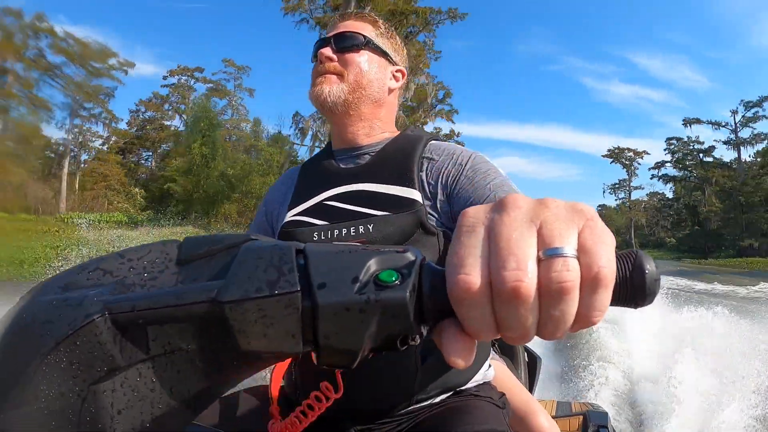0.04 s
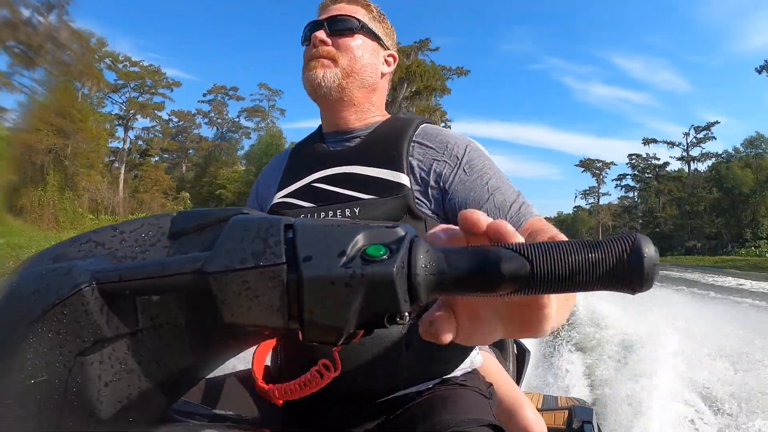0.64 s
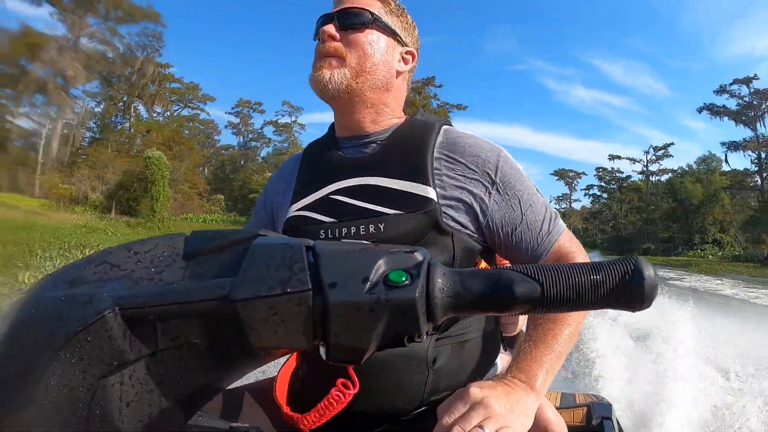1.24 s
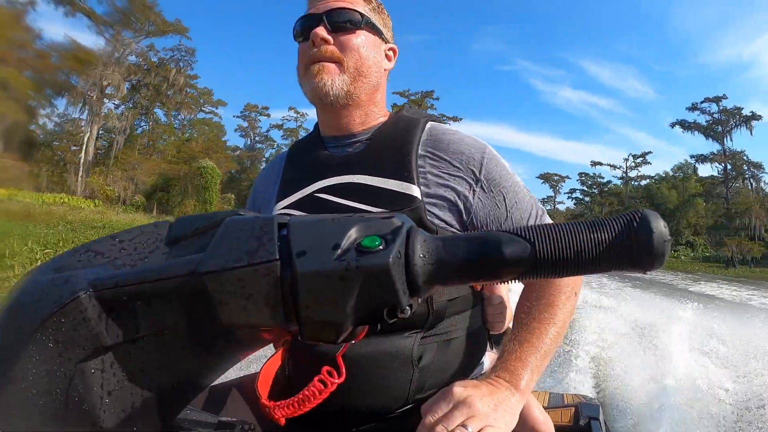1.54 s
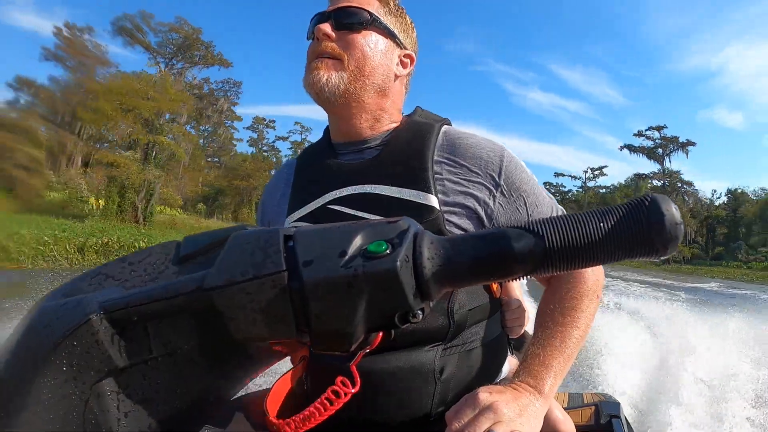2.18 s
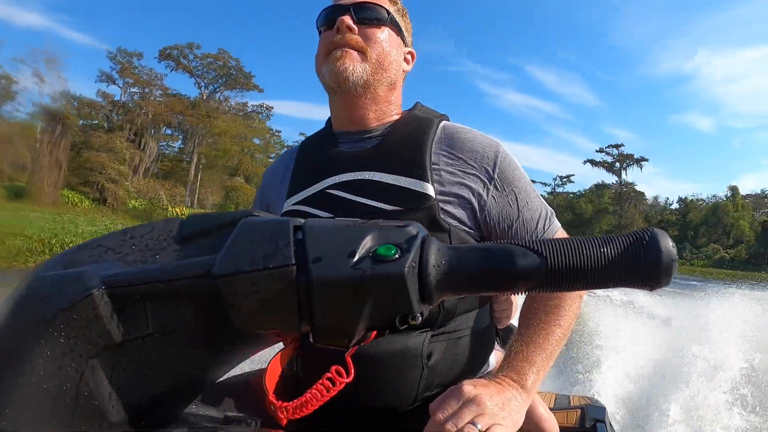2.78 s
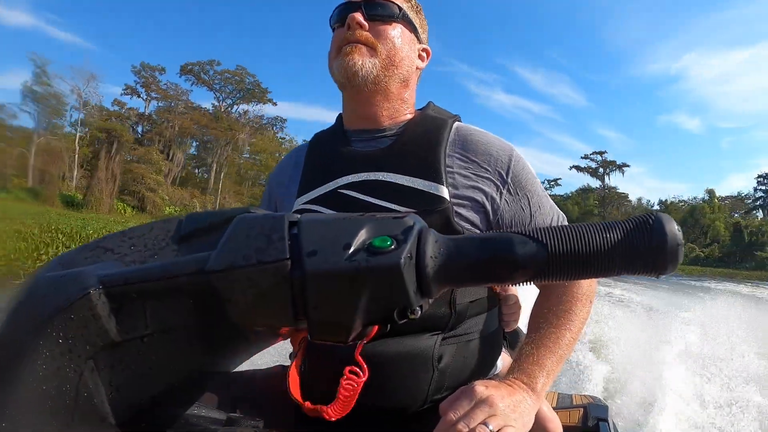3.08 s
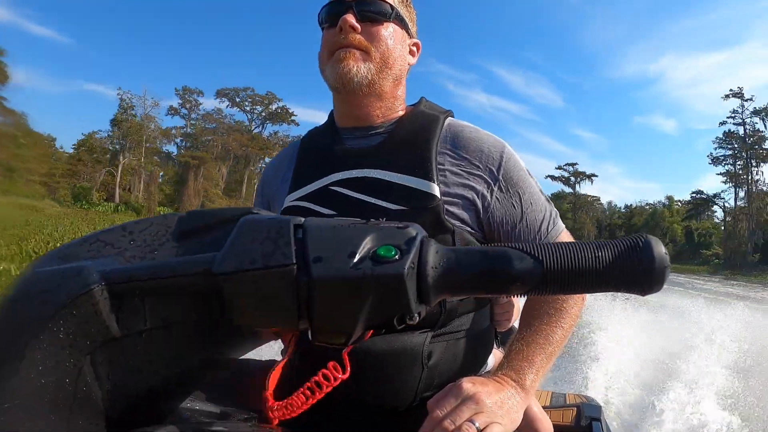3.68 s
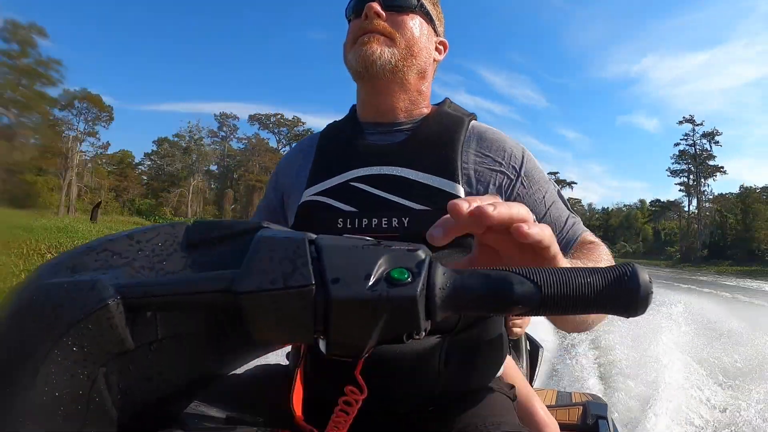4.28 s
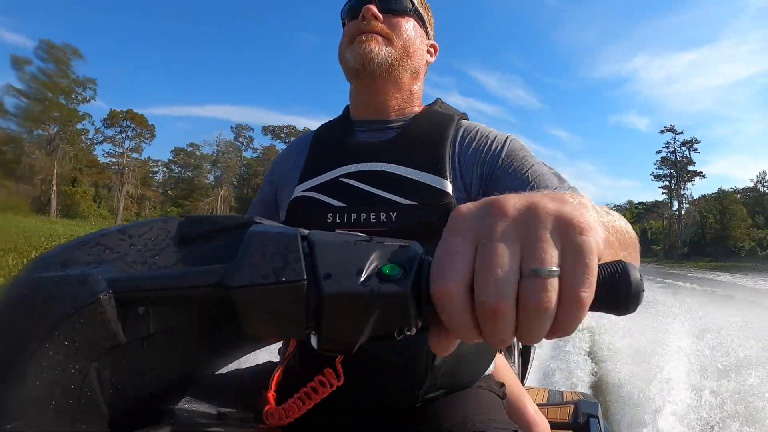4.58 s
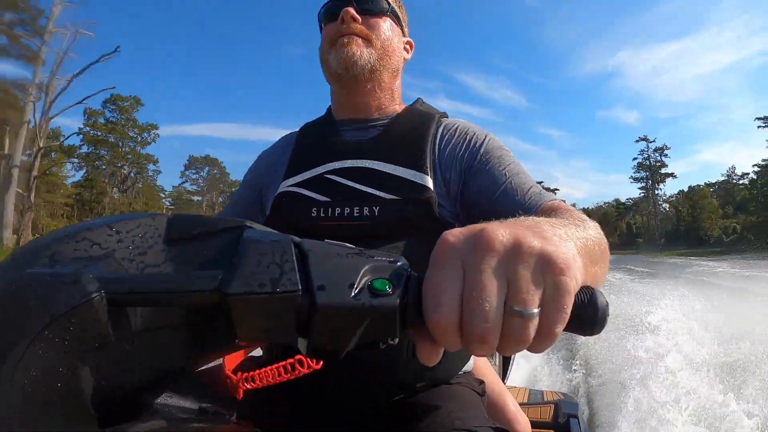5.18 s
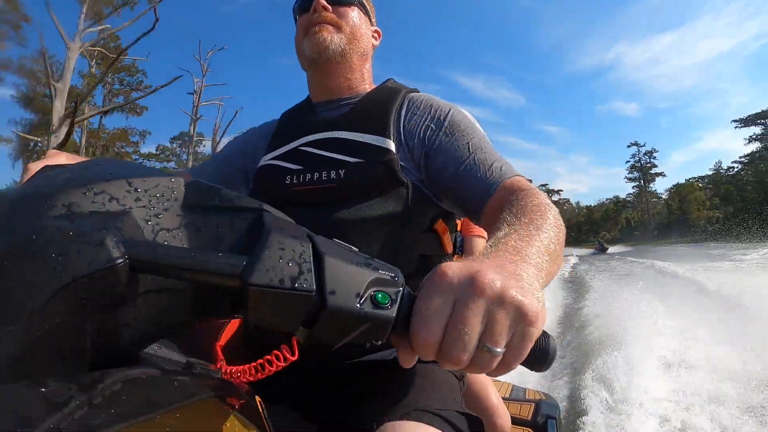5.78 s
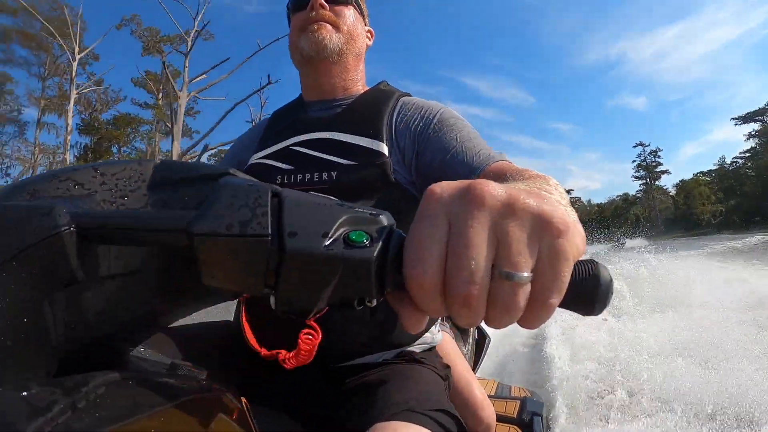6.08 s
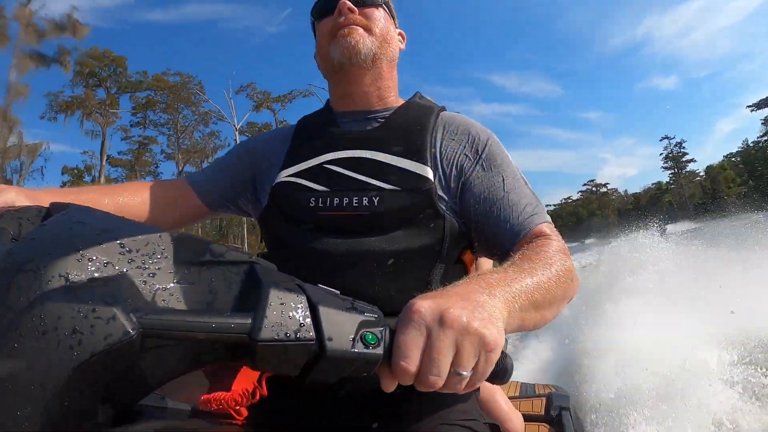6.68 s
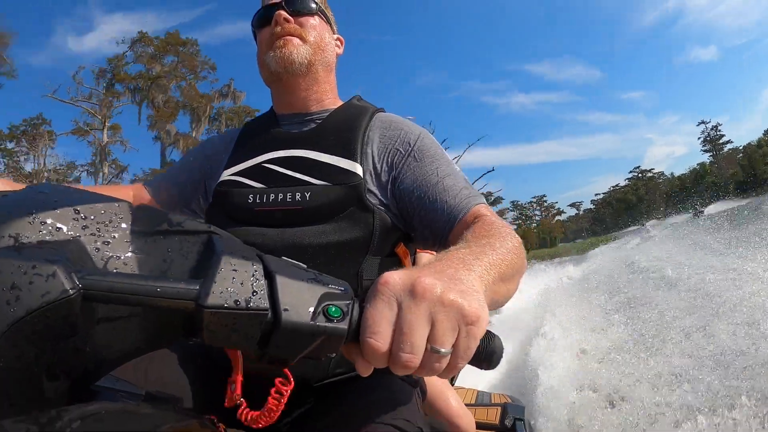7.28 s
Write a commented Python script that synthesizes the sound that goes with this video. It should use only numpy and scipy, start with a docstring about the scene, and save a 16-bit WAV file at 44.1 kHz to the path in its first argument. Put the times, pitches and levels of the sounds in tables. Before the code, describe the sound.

A supercharged personal watercraft runs fast along a river, heard from its handlebar. The exhaust drones and sputters under a thin whine, while wind rumbles and snaps on the microphone, the wake hisses and short, dull knocks come and go. The engine speeds up into a fuller drone, then drops back. Near the end spray hits the microphone, water gurgles briefly and the engine rises again.

```python
"""A supercharged personal watercraft runs fast along a narrow river, heard from its handlebar.
From the start the exhaust drones, choked at times by water, and the supercharger whines in step with
the engine; wind rumbles and snaps on the microphone, the wake hisses and short, dull knocks come and go.
From about 2 to 4 s the engine speeds up and the drone opens out, then it drops back to a sputter.
Near 7 s spray hits the housing, air gurgles through water on the microphone and the engine rises again."""
import sys
import numpy as np
from scipy import signal
from scipy.fft import rfft, irfft
from scipy.io import wavfile
from scipy.ndimage import uniform_filter1d, minimum_filter1d

SR = 44100
rng = np.random.default_rng(int(sys.argv[2]) if len(sys.argv) > 2 else 0)


def log_audio(samples):
    """Write samples as a 16-bit WAV file to the path given in sys.argv[1]."""
    # one column per channel
    frames = np.atleast_2d(samples).T
    # limit to full scale, then quantise
    limited = np.clip(frames, -1, 1)
    pcm = np.round(limited * 32767).astype(np.int16)
    wavfile.write(sys.argv[1], SR, pcm)


N = 332514


def exhaust(speed, firings, low_db=-23, open_db=-16.5, opens_at_hz=165.5, opens_over_hz=1.98):
    """Periodic firing drives the pipe: an almost pure tone, steady at speed, weak and sputtering below."""
    # gain as the outlet rides higher or lower in the water: (time [s], gain [dB])
    outlet = [(0, -1), (3.1, 0.7), (3.9, -2), (4.08, -5.5), (7.54, -3.5)]
    # water chokes the outlet: (time [s], gain [dB], half-width [s])
    chokes = [(.61, -7, 0.097), (1.04, -19, 0.066), (2.195, -10.5, 0.047), (3.42, -7.5, 0.024),
              (4.08, -14, 0.022), (4.22, -12, 0.055), (4.68, -13, 0.17), (5.96, -12, 0.051),
              (7.1, -14, 0.16)]
    # barks an octave above the drone: (time [s], level [dB], half-width [s])
    barks = [(.49, -27, 0.061), (2.415, -23.5, 0.025), (2.49, -27, 0.058), (2.9, -43, 0.12)]
    opened = .5 + .5 * np.tanh((speed - opens_at_hz) / opens_over_hz)
    sputter_db = low_db - 1.15 * drift(4.2)
    level_db = opened * open_db + (1 - opened) * sputter_db
    level = from_db(level_db + in_time(outlet)[0] + humps(chokes))
    drone = level * tone(firings, rough=0.025, rate=21)
    octave = (level * from_db(-18.5) + bursts(barks)) * tone(2 * firings, rough=0.14, rate=30)
    return drone + octave


def supercharger(speed, firings, order=7.75):
    """Forced vibration: the geared drive whines at a multiple of the firing rate, loudest at resonance."""
    # resonance of the housing: (centre [Hz], bandwidth [Hz], peak level [dB])
    housing_mode = (1275, 65, -37.7)
    # the whine swells or fades briefly: (time [s], gain [dB], half-width [s])
    swells = [(.03, 5, .1), (.26, 7, .09), (.52, 5, .06), (1.38, -8, .06), (1.65, 3.5, .2), (1.92, 7, .06),
              (2.04, 7, .09), (2.15, 6, .045), (4.16, -4, .08), (4.36, 2.5, .06), (4.48, -12, .03),
              (4.68, 4, .15), (5.1, 4.5, .15), (5.42, -9, .09), (5.8, 3.5, .15), (6.11, 7, .045),
              (6.3, 3, .08), (6.7, 2.5, .2), (7.22, -11, .13)]
    # overtones: (multiple of the whine, resonance [Hz], bandwidth [Hz], peak level [dB])
    partials = [(1.5, 2070, 54, -50), (2, 2660, 90, -48)]
    hz, turns = order * speed, order * firings
    swell_db = humps(swells)
    whine = resonance_gain(hz, housing_mode) * tone(turns, rough=0.08, rate=20)
    overtones = sum(resonance_gain(multiple * hz, mode) * tone(multiple * turns, rough=0.97, rate=75)
                    for multiple, *mode in partials)
    return from_db(swell_db) * whine + from_db(.6 * swell_db) * overtones


def engine_body(firings, body_db, throb=0.33):
    """Noisy firing puffs excite the hull's modes; four unequal cylinders add quarter-order lines."""
    # hull resonances: (frequency [Hz], bandwidth [Hz], relative level [dB])
    modes = [(215, 31, 0), (383, 54, 4.5), (434.5, 69, 6), (479, 25, 1.5), (738, 140, -7.5),
             (987, 200, -14)]
    # weaker engine lines: (frequency [quarters of the firing rate], relative level [dB])
    orders = [(3, -30.5), (5, -29), (6, -41), (9, -41.5), (10, -37.5), (11, -39), (12, -41), (15, -44),
              (16, -55.5), (24, -43.5), (28, -62.5), (38, -58.5)]
    puffs = rng.standard_normal(N) * (1 + throb * np.cos(2 * np.pi * firings))
    hull = sum(from_db(db) * resonate(resonate(puffs, hz, width), hz, 2 * width)
               for hz, width, db in modes)
    lines = sum(from_db(db) * tone(quarters * firings / 4, rough=.6, rate=7) for quarters, db in orders)
    lines_db = -6 + 0.16 * (body_db - body_db.max())
    return from_db(body_db - 5.5) * rms_one(hull) + from_db(lines_db) * lines


def wind(rumble_db):
    """Turbulent pressure: eddies on the microphone port make a lumpy rumble."""
    # rumble spectrum: (frequency [Hz], relative density [dB])
    spectrum = [(15, -7.5), (30, -4.5), (55, -0.5), (90, -1), (130, -2.5), (200, -3), (280, -10),
                (450, -11.5), (800, -37.5)]
    return from_db(rumble_db + 3.5) * colour(uneven_noise(spread_db=0.14, rate=15), spectrum)


def rush(rush_db, flutter_growth=0.94):
    """Turbulent flow: air and water rush past, tearing into more flutter the faster the air moves."""
    # spectrum of the steady flow: (frequency [Hz], relative density [dB])
    flow_spectrum = [(250, -6.5), (450, 5.5), (650, 6), (900, 1), (1150, 1), (1500, -6), (2100, -12),
                     (2800, -21.5), (3600, -22.5), (3950, -26), (4400, -39)]
    # spectrum of the fluttering rasp: (frequency [Hz], relative density [dB])
    rasp_spectrum = [(350, -9.5), (650, 1.5), (1000, -1), (1350, 0), (1700, -8.5), (2070, -6.5),
                     (2450, -12), (3100, -26), (4500, -43.5)]
    eddies = np.minimum(drift(100), 1.5)
    steady = colour(rng.standard_normal(N) * from_db(2.05 * eddies), flow_spectrum)
    rasp = colour(uneven_noise(spread_db=3.5, rate=300), rasp_spectrum)
    flutter = rms_one(from_db(5 * eddies))
    flutter_db = rush_db.max() - 8 + flutter_growth * (rush_db - rush_db.max())
    return from_db(rush_db - 0.5) * steady + from_db(flutter_db) * flutter * rasp


def gusts():
    """Each gust tears at the microphone port with a short rasp; being incoherent, gusts add in power."""
    # strongest gusts: (time [s], level [dB], half-width [s])
    blasts = [(0.018, -40, .009), (0.593, -35, .01), (.868, -36, 0.013), (1.029, -30.5, .013),
              (1.12, -35.5, 0.015), (2.064, -33, 0.011), (2.205, -31.5, 0.025), (2.987, -29, 0.016),
              (3.368, -30.5, 0.012), (3.43, -31.5, 0.023), (3.971, -33, 0.016), (4.016, -32, .022),
              (4.226, -33, 0.012), (4.364, -32.5, 0.033), (4.598, -31.5, 0.028), (4.824, -35, 0.035),
              (4.954, -29, 0.013), (5.261, -28, 0.0081), (5.422, -32, 0.0092), (5.67, -31.5, .028),
              (5.885, -34, 0.013), (6.247, -30, 0.017), (6.475, -33, .011), (6.532, -31.5, 0.013),
              (6.598, -37, 0.02), (6.72, -36, .01), (6.932, -26, .009)]
    # gust spectrum: (frequency [Hz], relative density [dB])
    spectrum = [(400, -9.5), (650, 2.5), (950, 2), (1400, 2), (1900, -1.5), (2300, -7), (3000, -19),
                (4500, -44.5)]
    t, power = np.arange(N) / SR, np.zeros(N)
    for s, db, length in blasts:
        near = slice(max(round((s - 2 * length) * SR), 0), round((s + 2 * length) * SR))
        power[near] += from_db(db) ** 2 * 2 ** -(((t[near] - s) / length) ** 4)
    return np.sqrt(power) * colour(uneven_noise(spread_db=3.5, rate=220), spectrum)


def snaps(rush_db, faint_per_s=38, lowest_hz=1100, span_octaves=.85, half_width_cycles=.8):
    """Pressure transients: eddies burst on the microphone port in dry snaps a cycle or two long."""
    # sharp snaps: (time [s], relative peak level [dB], pitch [Hz])
    sharp = [(.03, -22, 1600), (.293, -22, 1450), (.366, -28, 1150), (.435, -21, 950), (0.536, -30, 1400),
             (0.724, -22, 1350), (0.861, -15, 1300), (.87, -23, 1600), (0.961, -21, 1450),
             (1.008, -16.5, 1550), (1.015, -21, 1700), (1.027, -22, 1500), (1.051, -24, 1100),
             (1.129, -17.5, 1340), (1.449, -18, 1450), (1.508, -27, 1400), (2.134, -21, 1150),
             (2.222, -22, 1600), (2.377, -21, 1100), (2.501, -26, 1450), (2.744, -23, 1100),
             (2.908, -22.5, 1750), (2.965, -24, 1100), (3.248, -28, 1450), (3.316, -25, 1350),
             (3.778, -21, 1750), (3.793, -18, 1340), (3.915, -19.5, 1750), (3.951, -19.5, 1780),
             (3.998, -25, 1700), (4.02, -19, 1450), (4.184, -25, 1600), (4.233, -19, 1750),
             (4.297, -19, 1200), (4.33, -22, 1350), (4.394, -22, 1450), (4.601, -22, 1750),
             (4.749, -22, 1750), (4.968, -18, 1450), (5.255, -18, 1750), (5.266, -22, 1350),
             (5.282, -16, 1600), (5.362, -17, 1200), (5.422, -17, 1450), (5.468, -19, 1450),
             (5.481, -19, 1750), (5.696, -17, 1350), (5.743, -20, 1350), (5.876, -17, 1600),
             (5.9, -15, 1350), (5.938, -21, 1600), (6.044, -17, 1410), (6.239, -18, 1600),
             (6.468, -19, 1900), (6.525, -14.5, 1450), (6.595, -21, 1900), (6.614, -21, 1150),
             (6.718, -21, 1900), (6.726, -25, 1900), (6.929, -21, 1600), (6.937, -17, 1850)]
    # faint snaps fall at random and follow the level of the rush
    faint = [(when * N / SR, rush_db[int(when * N)] + 4.5 - 10 * weakness,
              lowest_hz * 2 ** (span_octaves * pitch))
             for when, weakness, pitch in rng.random((round(faint_per_s * N / SR), 3))]
    out, t = np.zeros(N), np.arange(N) / SR
    for s, db, hz in sharp + faint:
        near = slice(max(round(s * SR) - SR // 200, 0), round(s * SR) + SR // 200)
        turns = hz * (t[near] - s)
        envelope = from_db(db + 1) * np.exp(-(turns / half_width_cycles) ** 2)
        out[near] += envelope * np.cos(2 * np.pi * (turns + rng.random()))
    return out


def knocks(attack_s=0.0015, decay_s=.009):
    """Exponential decay of noise bursts: short, dull knocks that die at once."""
    # knocks: (time [s], level [dB])
    onsets = [(.353, -21.5), (.44, -30), (.59, -22), (.863, -25), (1.004, -21), (1.446, -22), (2.206, -23),
              (2.859, -30), (2.962, -32), (3.189, -32), (3.284, -26), (4.181, -27), (5.25, -23.5)]
    # knock spectrum: (frequency [Hz], relative density [dB])
    spectrum = [(450, -5), (750, 7.5), (1100, 3), (1500, -12), (2200, -18.5), (3200, -31.5)]
    t, gain = np.arange(N) / SR, np.zeros(N)
    for s, db in onsets:
        since = np.maximum(t - s, 0)
        gain += from_db(db) * np.minimum(since / attack_s, 1) * np.exp(-np.minimum(since / decay_s, 50))
    return gain * colour(rng.standard_normal(N), spectrum)


def spray(film_at_s=7.175, film_loss_db=-11, drain_s=.055):
    """Countless droplets of the wake sum incoherently to a hiss; in a surge the fine mist grows most."""
    # the wake: (time [s], relative hiss level [dB], relative mist level [dB])
    wake = [(0, -58.5, -69.5), (.6, -61, -78), (2.25, -60, -80.5), (2.44, -65, -82.5), (2.7, -63.5, -80),
            (3.3, -64, -84), (4.3, -62, -75.5), (4.9, -62.5, -72), (5.42, -62, -77), (6, -60, -69.5),
            (6.3, -59.5, -72.5), (6.75, -59.5, -69.5), (7.54, -64, -73)]
    # the wake throws up spray: (time [s], rise of the hiss [dB], half-width [s])
    surges = [(.84, 5.5, .035), (.95, 3.5, 0.027), (1.8, 2.5, 0.07), (3.34, 4.5, .025), (4.87, 1.5, .08),
              (5.56, 3.5, 0.074), (5.7, 2, 0.09), (5.82, 7, 0.042), (6.1, 3, 0.049), (6.55, 3, 0.2),
              (6.77, 3, 0.06), (6.98, 2, 0.053), (7.4, 2, .05)]
    # droplet hiss, dulled by the housing: (frequency [Hz], relative density [dB])
    hiss_spectrum = [(1500, 13.5), (2600, 15.5), (3650, 10.5), (4200, -3.5), (4900, -8.5), (5800, -2),
                     (6600, 0), (7300, -7), (8200, -17.5), (10200, -27.5), (12000, -40)]
    # finest mist: (frequency [Hz], relative density [dB])
    mist_spectrum = [(4000, -2), (6500, -4), (8000, -2), (10200, -5.5), (11800, -14), (14000, -28)]
    # a film of water muffles the hiss, then drains
    since = np.arange(N) / SR - film_at_s
    film_db = film_loss_db * (since > 0) * np.exp(-np.abs(since) / drain_s)
    change_db = humps(surges) + film_db
    hiss_db, mist_db = in_time(wake)
    hiss = colour(uneven_noise(spread_db=1.5, rate=3000) * from_db(1.8 * drift(18)), hiss_spectrum)
    mist = colour(uneven_noise(spread_db=3, rate=2000), mist_spectrum)
    return from_db(hiss_db + 15.5 + change_db) * hiss + from_db(mist_db - 1 + 1.6 * change_db) * mist


def drops(attack_s=0.0013, crack_db=-40):
    """Impact excitation: each drop bursts on the housing in a damped, pitched splash and a faint crack."""
    # spray landing: (time [s], level [dB], decay time [s], pitch [Hz])
    landings = [(6.748, -48, 0.041, 4500), (6.997, -21.5, 0.0032, 1500), (7.005, -60, 0.018, 8000),
                (7.015, -43, 0.00089, 8500), (7.019, -47, 0.0098, 4400), (7.029, -22, .005, 910),
                (7.03, -29, 0.0015, 2880), (7.073, -37, .002, 3000), (7.096, -55, 0.014, 5500),
                (7.106, -24.5, .004, 1400), (7.107, -21.5, 0.0031, 2520), (7.108, -47, 0.0018, 7000),
                (7.153, -47, 0.0046, 5700)]
    out, t = np.zeros(N), np.arange(SR // 4) / SR
    for s, db, decay, hz in landings:
        burst = rng.standard_normal(len(t))
        splash = rms_one(resonate(burst, hz, width=0.77 * hz, passes=4))
        crack = from_db(crack_db) * rms_one(resonate(burst, hz=6500, width=5000, passes=2))
        envelope = np.minimum(t / attack_s, 1) * np.exp(-t / decay)
        start = round(s * SR)
        out[start:start + len(t)] += (from_db(db) * (splash + crack) * envelope)[:N - start]
    return out


def gurgle():
    """Cavity resonance: the microphone port rings as air bubbles through the water that covers it."""
    # spells of gurgling: (time [s], level [dB], half-width [s])
    spells = [(7.089, -32, 0.0044), (7.105, -30, 0.0084), (7.155, -26.5, 0.0042), (7.194, -35, 0.021),
              (7.235, -40, 0.022), (7.316, -35.5, 0.031), (7.465, -31, 0.015), (7.5, -34, 0.021),
              (7.531, -33, 0.012)]
    bubbling = uneven_noise(spread_db=4, rate=100)
    return bursts(spells) * rms_one(resonate(bubbling, hz=1630, width=1250, passes=4))


def bubbles(rise_octaves_per_s=80):
    """Bubble resonance: air pockets pop out of the water on the port, each a short, rising bloop."""
    # air pockets: (time [s], level [dB], mid pitch [Hz], half-width [s])
    pockets = [(7.075, -13.5, 224, 0.0043), (7.103, -26.5, 705, 0.00655), (7.174, -18.5, 325, 0.0054),
               (7.18, -29, 680, .005)]
    out, t = np.zeros(N), np.arange(N) / SR
    for s, db, hz, length in pockets:
        near = np.abs(t - s) < 3 * length
        since = t[near] - s
        turns = np.cumsum(hz * 2 ** (rise_octaves_per_s * since)) / SR + rng.random()
        envelope = from_db(db) * np.sqrt(2) * np.exp(-(since / length) ** 2)
        out[near] += envelope * np.sin(2 * np.pi * turns)
    return out


def housing(x, cut_hz=9500):
    """Low-pass filtering: the wet housing dulls what lands on it."""
    return signal.sosfilt(signal.butter(2, cut_hz, fs=SR, output="sos"), x)


def from_db(db):
    """Amplitude ratio of a level in decibels."""
    return 10 ** (np.asarray(db) / 20)


def rms_one(x):
    """Normalisation to unit mean power."""
    return x / np.sqrt(np.mean(x ** 2) + 1e-20)


def in_time(rows):
    """Linear interpolation of each column over the times in the first."""
    s, *columns = np.transpose(rows)
    return [np.interp(np.arange(N) / SR, s, c) for c in columns]


def humps(rows):
    """Sum of Gaussian bells, one for each (time [s], height, half-width [s])."""
    t = np.arange(N) / SR
    return sum(height * np.exp(-((t - s) / length) ** 2) for s, height, length in rows)


def bursts(rows):
    """Amplitude envelope of Gaussian swells, one for each (time [s], level [dB], half-width [s])."""
    return humps([(s, from_db(db), length) for s, db, length in rows])


def drift(rate):
    """Random fluctuation of rms 1, band-limited to about `rate` Hz."""
    hz = np.fft.rfftfreq(N, 1 / SR)
    return rms_one(irfft(rfft(rng.standard_normal(N)) / (1 + (hz / rate) ** 4), N))


def uneven_noise(spread_db, rate):
    """Amplitude modulation: white noise whose level wanders at up to about `rate` Hz."""
    return rng.standard_normal(N) * from_db(spread_db * drift(rate))


def tone(turns, rough, rate):
    """A sine of rms 1 on a running phase, randomly modulated in amplitude and phase."""
    shaken = 1 + rough * (drift(rate) + 1j * drift(rate))
    return rms_one(np.real(shaken * np.exp(2j * np.pi * (turns + rng.random()))))


def colour(x, spectrum):
    """Spectral shaping to rms 1, with a roll-off beyond the ends of the spectrum."""
    hz = np.fft.rfftfreq(N, 1 / SR) + 1e-3
    points, db = np.transpose(spectrum)
    ends = np.minimum(hz / points[0], 1) ** 2 * np.minimum(points[-1] / hz, 1) ** 4
    gain = from_db(np.interp(np.log(hz), np.log(points), db))
    return rms_one(irfft(rfft(x) * ends * gain, N))


def resonate(x, hz, width, passes=1):
    """Two-pole resonance of peak gain 1 and bandwidth `width` Hz, applied `passes` times."""
    r = np.exp(-np.pi * width / SR)
    feedback = [1, -2 * r * np.cos(2 * np.pi * hz / SR), r * r]
    for _ in range(passes):
        x = signal.lfilter(np.array([1, 0, -1]) * (1 - r * r) / 2, feedback, x)
    return x


def resonance_gain(hz, resonance):
    """Lorentzian response: the gain of a tone at hz as it passes through a resonance."""
    centre, width, top_db = resonance
    return from_db(top_db) / (1 + (2 * (hz - centre) / width) ** 2)


def scene():
    """Superposition of engine, wind and water; one firing phase drives exhaust, supercharger and hull."""
    # engine speed: (time [s], firing rate [Hz])
    throttle = [(0, 169), (.43, 169), (.57, 162.3), (1.3, 160), (1.55, 162.5), (1.85, 162.5), (2.12, 164.7),
                (2.22, 169.3), (2.4, 172.5), (2.85, 188.8), (3.03, 189.3), (3.3, 181), (3.66, 176.5),
                (3.82, 182), (4.15, 167), (4.5, 162), (5.1, 165.6), (5.4, 161.5), (5.82, 164.3),
                (6.35, 164.8), (7.02, 159.5), (7.3, 174.5), (7.54, 182)]
    # relative levels along the ride: (time [s], wind rumble [dB], engine body [dB], rush [dB])
    ride = [(0, -24.5, -33, -30), (.22, -25.5, -30, -35), (.45, -24, -24.5, -34.5), (1.2, -22, -22, -32.5),
            (2.15, -26, -22, -32), (2.4, -32, -22.5, -33), (3.1, -26, -23.5, -32), (3.65, -26.5, -23, -35),
            (4.15, -22.5, -22, -31.5), (4.85, -23.5, -23, -31), (5.1, -24, -22, -30),
            (5.7, -23, -29.5, -27.5), (6.2, -23.5, -24.5, -29), (6.8, -22, -33, -28),
            (7.15, -23, -39, -31.5), (7.29, -24, -30, -29.5), (7.4, -22.5, -33, -32),
            (7.54, -24, -36, -28.5)]
    speed, = in_time(throttle)
    firings = np.cumsum(speed) / SR
    rumble_db, body_db, rush_db = in_time(ride)
    engine = exhaust(speed, firings) + supercharger(speed, firings) + engine_body(firings, body_db)
    rumble = wind(rumble_db)
    water = spray() + housing(drops() + gurgle() + bubbles())
    turbulence = rush(rush_db) + gusts() + snaps(rush_db)
    return (engine + rumble + water + turbulence + knocks())[None]


def record(dry, limit_db=-7.2, cutoff_hz=14700):
    """Peak limiting: a fast gain dip ducks the peaks, then a steep low-pass cuts the top."""
    needed = np.minimum(1, from_db(limit_db) / (np.abs(dry) + 1e-9))
    gain = uniform_filter1d(minimum_filter1d(needed, size=441), size=441)  # 10 ms windows
    fade_in = np.minimum(np.arange(N) / 130, 1)
    return signal.sosfilt(signal.cheby2(12, 70, cutoff_hz, fs=SR, output="sos"), dry * gain * fade_in)


dry = scene()
out = record(dry)
log_audio(out)
```